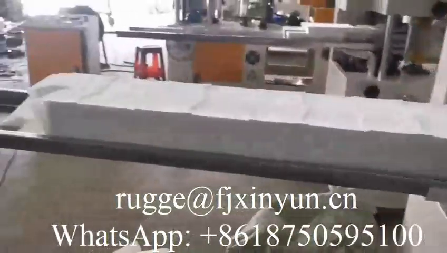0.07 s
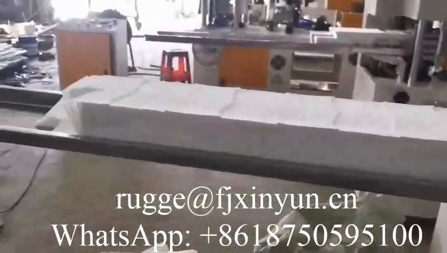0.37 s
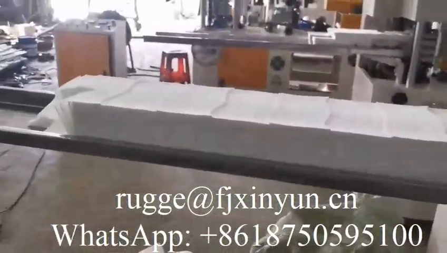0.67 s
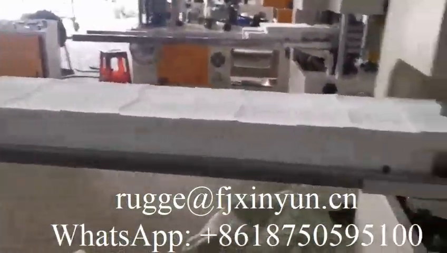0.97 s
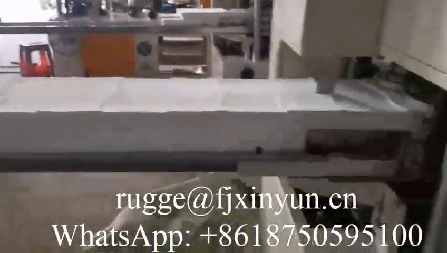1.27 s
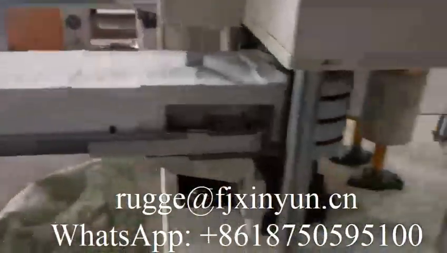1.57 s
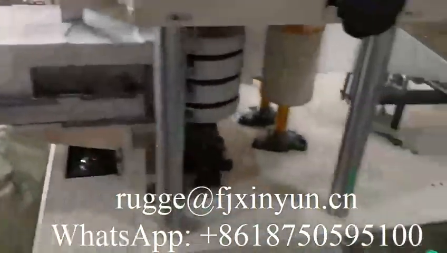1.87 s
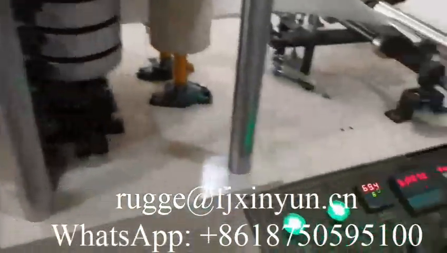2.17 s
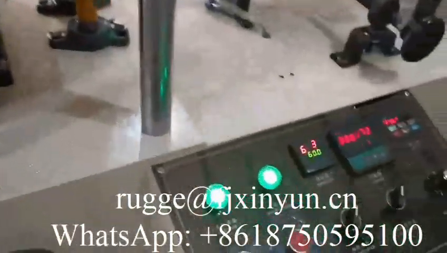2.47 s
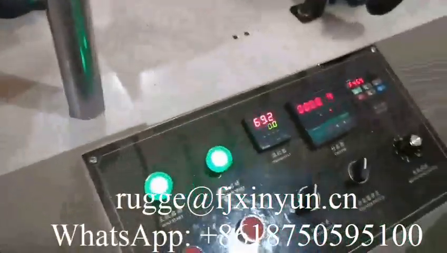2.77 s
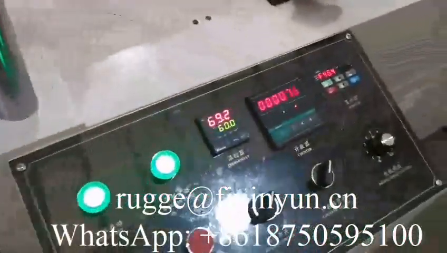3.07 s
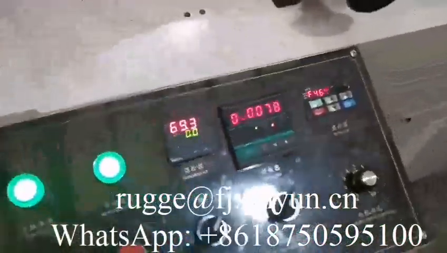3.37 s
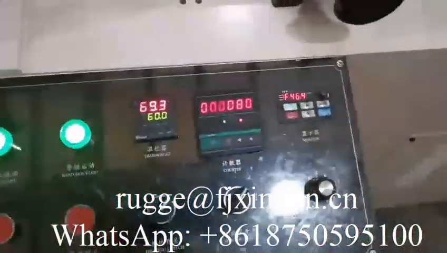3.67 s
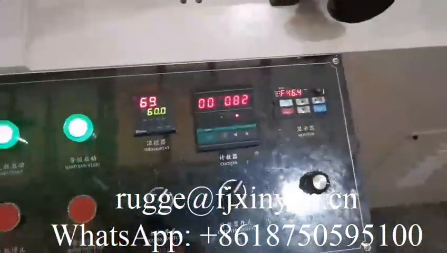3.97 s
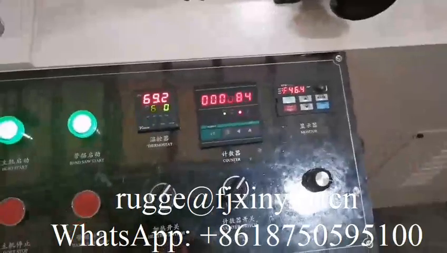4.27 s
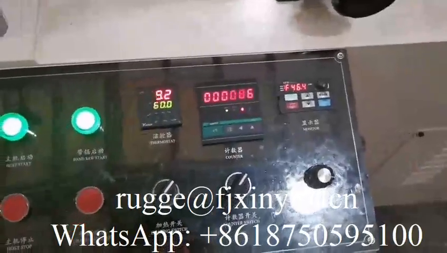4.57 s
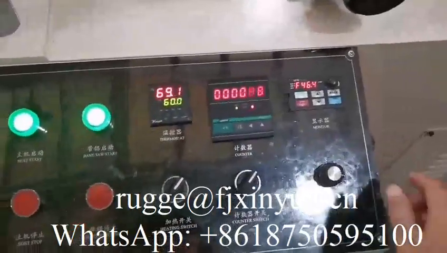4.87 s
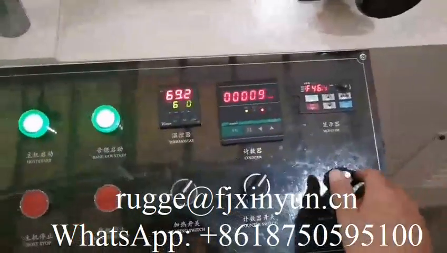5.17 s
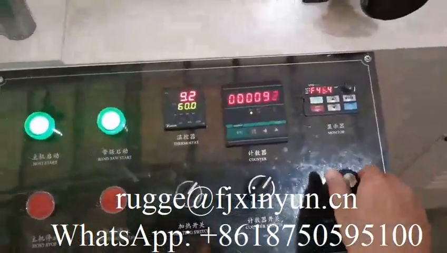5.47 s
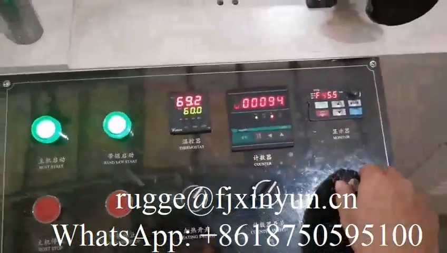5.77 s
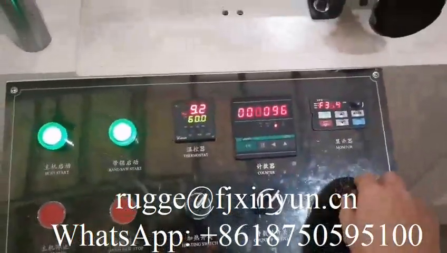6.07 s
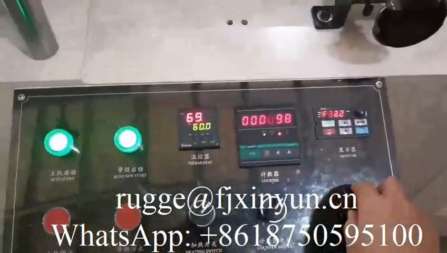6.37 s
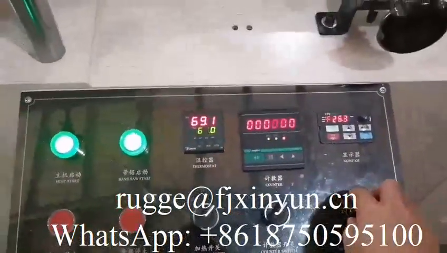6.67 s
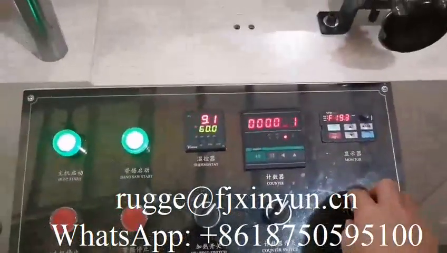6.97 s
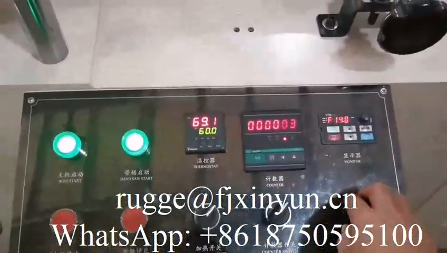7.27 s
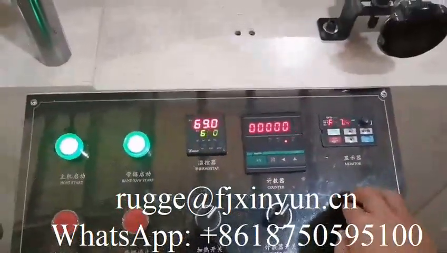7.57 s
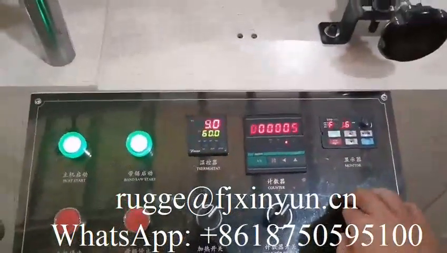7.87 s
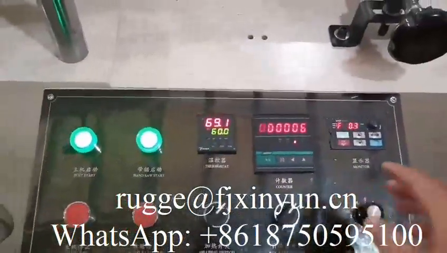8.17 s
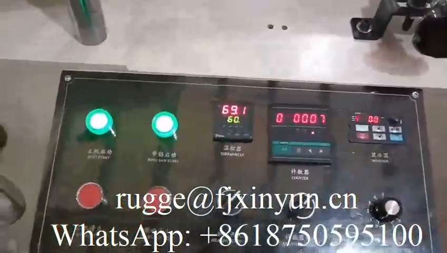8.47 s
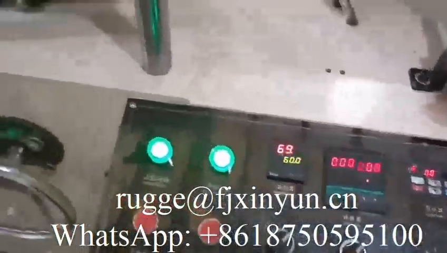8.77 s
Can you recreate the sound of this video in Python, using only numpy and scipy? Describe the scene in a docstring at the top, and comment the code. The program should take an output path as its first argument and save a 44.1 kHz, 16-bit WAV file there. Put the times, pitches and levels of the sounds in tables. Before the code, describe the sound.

Fast rhythmic metal clatter and gear hum from a factory machine wind down to scattered knocks over a steady background roar.

```python
"""Paper folding machine winding down

A folder runs in a factory hall at nearly seven folds a second. Gears hum, plates throb and the frame
rumbles in the same pattern every turn; steel fingers snap once a turn over a clatter of rollers and
links. The listener walks along the machine. Near 6 s the drive is turned down: the snaps give way to
loose clunks and ticks, a dry bearing squeals and the steady roar of the hall comes through."""
import sys
import numpy as np
from scipy import signal
from scipy.fft import rfft, irfft
from scipy.io import wavfile

SR = 44100
rng = np.random.default_rng(int(sys.argv[2]) if len(sys.argv) > 2 else 0)


def wav_out(sig):
    """Save sig, one row per channel (or a flat mono array), as 16-bit PCM at SR to the path in sys.argv[1]."""
    wavfile.write(sys.argv[1], SR, np.round(np.clip(np.atleast_2d(sig).T, -1, 1) * 32767).astype(np.int16))


N = 388521
TIME = np.arange(N) / SR

# the drive holds its speed, then ramps down: t/s, speed/(turns/s)
SPEED = [(0, 6.768), (5.87, 6.768), (8.81, 2.343)]
# tone colours of frame, links and folding fingers: f/Hz, level/dB
FRAME = [(30, -37), (60, -21.5), (100, -14), (125, -9.5), (150, -2), (195, 1.5), (240, -9), (300, .5),
         (400, -1), (500, 0), (650, -9), (900, -11.5), (1400, -17), (3000, -45)]
LINKS = [(200, -27.5), (500, -3.5), (680, -9), (830, -2), (1050, -1), (1250, -0.5), (1550, 0), (1900, -4.5),
         (2400, -11.5), (3600, -15), (5000, -21), (7500, -51.5)]
FINGERS = [(600, -35), (1400, -2), (1900, 6.5), (2500, 0.5), (3100, 3.5), (3600, 3), (4400, 0.5),
           (5500, -5), (6300, -6), (6900, -5), (7500, -11.5)]
# resonances of frame, panels and fingers: f/Hz, width/Hz, lift/dB
FRAME_MODES = [(152, 70, 2.5), (336, 22, 0.5), (379, 26, 2.5), (503, 11, 2)]
PANEL_MODES = [(812, 77, 4), (1223, 97, 3.5), (1350, 220, 1.5)]
FINGER_MODES = [(1822, 250, 2.4), (2783, 78, 6.5), (3510, 140, 3.8), (3995, 250, 4.5), (4180, 43, 2.3),
                (6900, 750, 3.9)]


def gain_of(db):
    return 10 ** (np.asarray(db) / 20)


def unit_rms(x):
    return x / np.sqrt(np.mean(x ** 2) + 1e-20)


def follow(rows):
    """An automation curve through (time, value) points."""
    return np.interp(TIME, *np.transpose(rows))


def at_pitch(points, hz):
    """Reads a curve along a log frequency axis."""
    f, value = np.transpose(points)
    return np.interp(np.log(hz + 1), np.log(f + 1), value)


def peaks_db(hz, modes):
    """The lift that resonances give at a frequency."""
    return sum(db / (1 + (2 * (hz - f) / width) ** 2) for f, width, db in modes)


def response_db(hz, points, modes):
    """A broad spectrum with resonant peaks on it."""
    return at_pitch(points, hz) + peaks_db(hz, modes)


def colour(x, points, modes):
    """Minimum-phase EQ with the given spectrum; the result has rms 1."""
    hz = abs(np.fft.fftfreq(8192, 1 / SR))
    log_gain = np.log(gain_of(response_db(hz, points, modes)))
    taps = np.fft.ifft(np.exp(np.conj(signal.hilbert(log_gain)))).real
    return unit_rms(signal.oaconvolve(x, taps[:len(taps) // 2])[:N])


def drift(rate_hz):
    """Smooth random modulation of rms 1."""
    hz = np.fft.rfftfreq(N, 1 / SR)
    return unit_rms(irfft(rfft(rng.standard_normal(N)) * np.exp(-(hz / rate_hz) ** 2), N))


def ring(x, hz, width_hz):
    """A steep resonance; the result has rms 1."""
    carrier = np.exp(2j * np.pi * np.cumsum(hz * np.ones(N)) / SR)
    pole = np.exp(-np.pi * width_hz / SR)
    return unit_rms((carrier * signal.lfilter([1], [1, -2 * pole, pole * pole], x / carrier)).real)


def whine(hz, waver_hz, rate_hz):
    """A tone of rms 1 whose pitch and strength waver."""
    phase = 2 * np.pi * np.cumsum(hz + waver_hz * drift(rate_hz)) / SR
    return unit_rms(np.sin(phase) * gain_of(2 * drift(rate_hz)))


def impacts(per_s, spread_db):
    """Random clicks of uneven size."""
    size = gain_of(spread_db * np.minimum(rng.exponential(1, N), 4))
    return size * rng.choice([-1., 1.], N) * (rng.random(N) < per_s / SR)


def burst(start, db, rise_s, decay_s):
    """Envelope of one blow: a quick rise and a fall."""
    age = np.maximum(TIME - start, 0)
    return gain_of(db) * (1 - np.exp(-age / rise_s)) * np.exp(-age / decay_s)


def arch(start, length):
    """A half-sine swell."""
    return np.sin(np.pi * np.clip((TIME - start) / length, 0, 1))


def once_a_turn(turns, place, width):
    """A bell-shaped swell around one place in the turn."""
    return np.exp(-(((turns - place + .5) % 1 - .5) / width) ** 2 / 2)


def in_tune(speed, orders, hz, width_hz):
    """How closely the nearest gear tone matches a resonance, 0-1."""
    return np.max([1 / (1 + (2 * (teeth * speed - hz) / width_hz) ** 2) for teeth in orders], axis=0)


def halvings():
    """How many times the drive has halved its full speed."""
    return np.log2(SPEED[0][1] / follow(SPEED))


def dulled(x, above_hz=1700, db_per_halving=6.5):
    """Slower links knock more dully: the treble falls with the speed."""
    treble = signal.sosfiltfilt(signal.butter(2, above_hz, "high", fs=SR, output="sos"), x)
    return x - treble * (1 - gain_of(-db_per_halving * halvings()))


def heard(part):
    """A part's fader, riding on its distance from the listener and on the drive speed."""
    # the listener's walk along the machine: t/s, position/m
    walk = [(0, 0.1), (.9, -0.54), (1.6, 0.46), (2.4, 1.3), (3.1, 1.8), (3.8, 2.5)]
    # per part: position/m, distance from the path/m, nearest level/dB, loss per halving of speed/dB
    parts = { "frame": (2.0, 2.5, -29, 6.5), "mesh": (1.48, 1.5, -38, 1), "links": (2, 5, -26.5, 6.5),
             "springs": (-0.5, 1.14, -30.5, 16), "fingers": (1.2, 1, -32.5, 30),
             "paper": (2, 3.5, -29.5, 22), "sprocket": (2.5, 1.2, -35.5, 12.5),
             "roller": (1.6, 0.6, -37, 7), "table": (0.53, 0.97, -34, 12), "guard": (2, 1, -39.5, 7),
             "bearing": (2.5, 1, -39.5, 11.5), "boom": (2.5, 0.5, -43, -2), "base": (1.5, 0, -47, -2), }
    position, distance, db, loss_db = parts[part]
    return gain_of(db - loss_db * halvings()) * distance / np.hypot(distance, follow(walk) - position)


def in_hall(x, wet_db, count=3):
    """Hall reverb: diffuse tails, longest in the mids, crossfaded so that no fixed pitch rings out."""
    # reverb time: f/Hz, t60/s
    room = [(100, 0.22), (1000, 0.61), (3500, 0.23), (8000, 0.19)]
    wet = np.zeros(N)
    for k in range(count):
        hz, t, noise = signal.stft(rng.standard_normal(SR // 2), SR, nperseg=256)
        decay = gain_of(-60 * t / at_pitch(room, hz)[:, None])
        tail = signal.istft(noise * decay, SR, nperseg=256)[1]
        send = np.cos(np.pi * (2 * TIME + k / count)) * np.sqrt(2 / count)
        wet += signal.fftconvolve(x * send, tail / np.linalg.norm(tail))[:N]
    return x + gain_of(wet_db) * wet


def gears(turns, speed, mesh_teeth=30):
    """Tooth tones locked to the shaft; each swells as it slides through a resonance of the frame."""
    # weaker gear and chain tones: order/(cycles/turn), and for each its level/dB
    orders = [18, 21, 22, 28, 32, 40, 47, 60, 62, 65, 70, 71, 82, 88]
    order_db = [-17, -17.5, -27, -23.5, -25.5, -13.5, -15.5, -19, -14.5, -25, -13.5, -13, -12.5, -9]
    # gearbox resonances that lift the mesh tone: f/Hz, width/Hz, lift/dB
    gearbox_modes = [(202.8, 15, 7.5), (146, 9.3, 6)]
    shaft = turns + .0016 * drift(rate_hz=6)

    def tone(teeth):
        swell = gain_of(response_db(teeth * speed, FRAME, FRAME_MODES))
        return np.sqrt(2) * swell * np.sin(2 * np.pi * (teeth * shaft + rng.random()))
    load_db = 1.3 * np.cos(2 * np.pi * (turns - .38)) + 1.8 * drift(rate_hz=17)  # peaks once a turn
    mesh = heard("mesh") * gain_of(peaks_db(mesh_teeth * speed, gearbox_modes)) * tone(mesh_teeth)
    others = heard("frame") * sum(gain_of(db) * tone(teeth) for teeth, db in zip(orders, order_db))
    return gain_of(load_db) * (mesh + others)


def rumble(turns, size=4096):
    """The same bumps come round every turn and shake the frame, along with loose knocks."""
    one_turn = irfft(np.exp(2j * np.pi * rng.random(size // 16)), size)
    bumps = np.interp(turns, np.arange(size) / size, one_turn, period=1)
    heave = gain_of(np.cos(2 * np.pi * (turns - .38)))  # hardest as the fingers swing back
    repeating = colour(heave * bumps, FRAME, FRAME_MODES)
    loose = colour(heave * impacts(per_s=1100, spread_db=4.5), FRAME, FRAME_MODES)
    return heard("frame") * (gain_of(-2) * repeating + gain_of(-6) * loose)


def plate_throbs(turns, fade_s=.34):
    """Wavering plates hum up once a turn, each for its own stretch of time, and flare now and then."""
    # throbs: start/s, end/s, f/Hz, place/turns, width/turns, level/dB
    throbs = [(1.85, 3.62, 410, .51, .1, -26), (1, 3.9, 406, .85, .083, -40),
              (3.3, 6.34, 403, .22, .075, -29), (3.6, 6.3, 406, .44, .035, -32),
              (1.5, 6.4, 486, .42, .05, -29), (3, 6.3, 479, .18, .06, -28.5), (1.5, 3.5, 475, .8, .07, -33),
              (1.6, 6.2, 319, .72, .07, -30), (1.5, 3.5, 297, .35, .045, -32),
              (.2, 3.7, 325, .11, .046, -35), (-.3, 1.7, 577, .93, .07, -32.5),
              (3.2, 6.4, 965, .3, .15, -37), (3.3, 5.2, 1030, .8, .06, -32),
              (1.5, 6.1, 1183, .89, .06, -27), (-.3, 3.3, 1243, .46, .055, -29),
              (2.3, 3.6, 1390, .62, .15, -32), (3.2, 6.4, 1280, .09, .06, -30.5),
              (4.5, 6.4, 1228, .17, .05, -28.5), (4.5, 8.15, 1322, .72, .09, -32.5)]
    # flares, mostly during the slowdown: t/s, length/s, f/Hz, level/dB
    flares = [(1.684, 0.23, 740, -33.5), (2.55, 0.28, 690, -39), (4.67, 0.077, 775, -30.5),
              (5.995, 0.37, 403, -28.5), (6.068, 0.13, 302, -29.5), (6.358, .14, 465, -34),
              (6.48, .14, 177, -34), (6.62, 0.25, 370, -31.5), (6.85, .16, 345, -34),
              (6.86, 0.15, 410, -32), (7.12, 0.17, 480, -34), (6.78, 0.14, 102, -39),
              (6.848, 0.16, 160.5, -34), (6.9, 0.25, 152, -31), (7.1, .26, 146, -30),
              (7.23, 0.2, 400, -33.5), (7.47, 0.16, 347, -29), (7.66, .2, 493, -38), (7.66, .22, 404, -36),
              (8.05, .45, 59, -50), (8.19, 0.28, 122, -39.5), (8.547, .22, 345, -37)]
    wobble = drift(rate_hz=28) / 1400  # phase wobble grows with pitch: one radian at 1400 Hz
    uneven = gain_of(-1.5 + 1.4 * drift(rate_hz=12))

    def plate(hz):
        shift = rng.integers(N)  # each plate wavers by itself
        return np.roll(uneven, shift) * np.sin(2 * np.pi * hz * TIME + np.roll(wobble, shift) * hz)
    out = sum(gain_of(db) * arch(start, length) * plate(hz) for start, length, hz, db in flares)
    for start, end, hz, place, width, db in throbs:
        fade = np.clip(np.minimum(TIME - start, end - TIME) / fade_s, 0, 1)
        out += gain_of(db) * fade * once_a_turn(turns, place, width) * plate(hz)
    return np.sqrt(2) * out


def low_hum(speed, hz=145.9, swell_db=4.5):
    """A low, rough hum that swells whenever a gear tone slides through its pitch."""
    swell = gain_of(swell_db * in_tune(speed, orders=(30, 40, 42, 47), hz=hz, width_hz=31))
    hum = whine(hz, waver_hz=6, rate_hz=11.7)
    hum += gain_of(-4.5) * ring(rng.standard_normal(N), hz, width_hz=42)
    return heard("boom") * swell * hum


def roller():
    """A spinning roller sings in a narrow band of noise."""
    return heard("roller") * ring(rng.standard_normal(N), hz=1193, width_hz=120)


def paper_table():
    """The paper table rings with a broad, breathy midrange."""
    return heard("table") * ring(rng.standard_normal(N), hz=637, width_hz=227)


def guard_plate(turns, speed, hz=407.6, swell_db=10.5):
    """A guard plate pulses every turn and swells as gear tones slide past its pitch."""
    shake_db = swell_db * in_tune(speed, orders=(62, 65, 88), hz=hz, width_hz=4.4)
    shake_db += 3 * np.cos(2 * np.pi * (turns - .34))
    return heard("guard") * gain_of(shake_db) * whine(hz, waver_hz=3.165, rate_hz=11)


def bearing_squeak(turns):
    """A dry bearing rubs and squeaks once a turn."""
    rub_db = 7 * (np.cos(2 * np.pi * (turns - .56)) - 1)
    return heard("bearing") * gain_of(rub_db) * whine(hz=2006, waver_hz=18, rate_hz=45)


def chain(turns, count=48):
    """Each link of the drive chain knocks at its own place in the turn, with its own force."""
    places = np.sort(rng.random(count))
    force = np.tanh(rng.standard_normal(count))
    link = np.searchsorted(places, (turns + .0007 * drift(rate_hz=22)) % 1) % count
    return unit_rms(force[link] * (np.diff(link, prepend=link[0]) != 0))


def clatter(turns):
    """Chain, links and rollers rattle in waves each turn and ring the panels."""
    # rattle through one turn: place/turns, level/dB
    rattle = [(0, 5.5), (.15, 5.5), (.33, 2.5), (.43, 3), (0.519, 5), (0.661, 8.5), (0.849, 4)]
    knocks = unit_rms(impacts(per_s=2000, spread_db=2.5)) + gain_of(-6) * chain(turns)
    knocks *= gain_of(np.interp(turns, *np.transpose(rattle), period=1))
    panels = colour(knocks, LINKS, PANEL_MODES)
    return heard("links") * dulled(unit_rms(in_hall(panels, wet_db=-3.5)))


def sprocket(turns, teeth=12):
    """Each tooth of a sprocket knocks dully as it takes up the chain."""
    tooth_phase = (teeth * turns - .35) % 1
    knocks = np.exp(-tooth_phase / .2) * impacts(per_s=4000, spread_db=2)
    return heard("sprocket") * ring(knocks, hz=895, width_hz=370)


def hall_bed(roar_db=-34, whine_db=-58):
    """Other machines: a steady roar and a thin whine."""
    # colour of the roar: f/Hz, level/dB
    spectrum = [(25, -31), (60, -16.5), (95, -16.5), (145, -8.5), (220, 6), (400, 4), (650, -7), (900, 1.5),
                (1300, -1.5), (1700, -12.5), (2800, -10.5), (4000, -18.5), (5500, -16.5), (7000, -17),
                (7800, -25.5)]
    # its resonances: f/Hz, width/Hz, lift/dB
    modes = [(540, 30, 2.9), (1342, 110, 7), (2260, 22, 3.1), (2430, 23, 5.8), (6800, 130, 4.3)]
    roar = gain_of(roar_db + 1.7 * drift(rate_hz=11)) * colour(rng.standard_normal(N), spectrum, modes)
    return roar + gain_of(whine_db) * whine(hz=2320, waver_hz=5, rate_hz=18)


def fold_snaps(speed, trim_db=-.17):
    """Each fold is a quick run of blows, short bursts of metal and paper crackle."""
    # folds: t/s, level/dB
    folds = [(0.106, -25), (0.254, -26), (0.4, -27), (0.55, -28.5), (0.694, -27), (0.845, -27.5),
             (0.993, -27), (1.138, -26.0), (1.285, -26), (1.436, -26.5), (1.581, -26), (1.731, -29.5),
             (1.877, -27), (2.027, -28), (2.172, -27), (2.322, -26), (2.47, -27.5), (2.617, -24.5),
             (2.766, -26), (2.911, -24), (3.06, -26.5), (3.208, -26), (3.358, -25.5), (3.505, -29.5),
             (3.652, -29.5), (3.8, -30.5), (3.948, -28.5), (4.096, -32), (4.247, -28), (4.39, -29.2),
             (4.537, -27), (4.687, -30.5), (4.838, -31), (4.98, -30), (5.13, -28), (5.277, -28.5),
             (5.425, -27.5), (5.572, -29), (5.72, -30), (5.868, -29), (6.019, -28.5), (6.176, -27.9),
             (6.336, -30), (6.504, -30)]
    # blows within a fold: offset/turns, level against the fold/dB, power decay/s
    blows = [(-.115, -6.5, .0054), (-.07, -11, .006), (-.02, -4, .0032), (0, 4, 0.0035),
             (.05, -3.5, 0.0082), (.105, -4, 0.01), (.225, -13.5, .008), (.32, -11.5, .03)]
    times, fold_db = np.transpose(folds)
    power = np.zeros(N)
    for offset, db, decay in blows:
        at = ((times + offset / np.interp(times, TIME, speed)) * SR).astype(int)
        kicks = np.zeros(N)
        kicks[np.clip(at, 0, N - 1)] = gain_of(fold_db + db + .9 * rng.standard_normal(len(times))) ** 2
        power += signal.lfilter([1], [1, -np.exp(-1 / (decay * SR))], kicks)
    crackle = colour(np.sqrt(power) * impacts(per_s=6000, spread_db=1), FINGERS, FINGER_MODES)
    return gain_of(trim_db) * np.sqrt(power.mean()) * unit_rms(in_hall(crackle, wet_db=-9.5))


def clinks(turns):
    """Steel fingers and springs ring briefly, struck at the same places every turn with uneven force."""
    # steel rings: part, place/turns, f/Hz, level/dB, decay/s
    rings = [("springs", -0.1, 4800, -2.2, 0.0061), ("springs", 0, 4200, 1, .006),
             ("springs", 0, 4750, -5, 0.0044), ("springs", .225, 3020, -2, .0085),
             ("springs", .225, 3400, -5, 0.0091), ("springs", .24, 4350, -4.5, 0.011),
             ("springs", .3, 3030, 1, .009), ("fingers", -0.1, 3420, 1, .006),
             ("fingers", -0.1, 4150, -2, 0.0063), ("fingers", -.003, 3800, 3.1, .007),
             ("fingers", 0, 3560, 3, .007), ("fingers", .1, 3620, 2.8, 0.0062),
             ("fingers", .095, 2900, 0, 0.0059), ("fingers", 0.25, 6850, -7, 0.009)]
    out, t = np.zeros(N), np.arange(SR // 10) / SR
    for part, place, hz, db, decay in rings:
        at = np.flatnonzero(np.diff(np.floor(turns - place)) > 0)  # the shaft passes this place
        strikes = np.zeros(N)
        strikes[at] = heard(part)[at] * gain_of(db + 1.3 * rng.standard_normal(64)[:len(at)])
        out += signal.oaconvolve(strikes, np.exp(-t / decay) * np.sin(2 * np.pi * hz * t))[:N]
    return in_hall(out, wet_db=-7)


def paper_swish(turns):
    """The sheet swishes over the plates just after each fold."""
    swell = once_a_turn(turns, place=.079, width=.09)
    return heard("paper") * swell * ring(rng.standard_normal(N), hz=1818, width_hz=460)


def braking():
    """As the drive slows, the linkage clunks through its slack and the loose fingers tick."""
    # clunks and ticks: t/s, level/dB
    clunk_cues = [(6.44, -25.5), (6.594, -24), (6.68, -27.5), (6.772, -33), (6.825, -35), (6.954, -25),
                  (7.162, -24.5), (7.365, -27.5), (7.411, -43), (7.47, -34), (7.612, -28.5), (7.715, -32),
                  (7.755, -35), (7.85, -38), (7.904, -36), (7.982, -36), (8.108, -33.5), (8.17, -36),
                  (8.263, -33), (8.485, -32.5)]
    tick_cues = [(6.594, -29), (6.678, -25.5), (6.772, -28), (6.822, -28), (6.845, -30), (6.888, -31),
                 (6.962, -28), (7.046, -37), (7.092, -32), (7.165, -30), (7.25, -32.5), (7.367, -37),
                 (7.382, -41), (7.47, -34), (7.525, -31), (7.725, -33.5), (7.765, -31.5), (7.972, -37),
                 (8.035, -34), (8.176, -34), (8.329, -31), (8.497, -39), (8.688, -35)]
    heavy = sum(burst(start, db, rise_s=.0024, decay_s=.029) for start, db in clunk_cues)
    light = sum(burst(start, db, rise_s=.002, decay_s=.011) for start, db in tick_cues)
    clunks = gain_of(-.5) * dulled(colour(impacts(per_s=3500, spread_db=4), LINKS, PANEL_MODES))
    clunks += gain_of(1.5) * ring(rng.standard_normal(N), hz=1254, width_hz=400)
    clunks += gain_of(.5) * colour(impacts(per_s=2500, spread_db=1.5), FRAME, FRAME_MODES)
    ticks = gain_of(-1.5) * colour(impacts(per_s=2700, spread_db=1), FINGERS, FINGER_MODES)
    return in_hall(heavy * clunks, wet_db=-9.5) + in_hall(light * ticks, wet_db=-5)


def bearing_squeals(rough_db=4):
    """The dry bearing squeals as the shaft crawls, rough with stick and slip."""
    # squeals: t/s, length/s, f/Hz, waver/Hz, level/dB
    squeals = [(7.825, .14, 2042, 36, -39.5), (8.07, .17, 2040, 26, -42.5), (8.47, .1, 2035, 18, -45.5),
               (8.56, .26, 2280, 22, -50.5)]
    rough = unit_rms(gain_of(rough_db * drift(rate_hz=130)))
    return rough * sum(gain_of(db) * np.sqrt(abs(arch(start, length))) * whine(hz, waver, rate_hz=90)
                       for start, length, hz, waver, db in squeals)


def scene(first_fold_s=.106):
    """One shaft sets the rhythm of the machine; the hall lies behind it."""
    speed = follow(SPEED)
    turns = np.cumsum(speed) / SR - first_fold_s * speed[0]
    drive = gears(turns, speed) + rumble(turns) + plate_throbs(turns) + low_hum(speed)
    singing = roller() + paper_table() + guard_plate(turns, speed)
    bearing = bearing_squeak(turns) + bearing_squeals()
    folding = clatter(turns) + sprocket(turns) + fold_snaps(speed) + paper_swish(turns) + clinks(turns)
    return (drive + singing + bearing + folding + braking() + hall_bed())[None]


def record(dry, edge_hz=7750):
    """A steep low-pass takes the air off the top."""
    taps = signal.firwin(255, edge_hz, window=("kaiser", 9), fs=SR)
    return signal.oaconvolve(dry, taps[None], "same")


dry = scene()
out = record(dry)
wav_out(out)
```